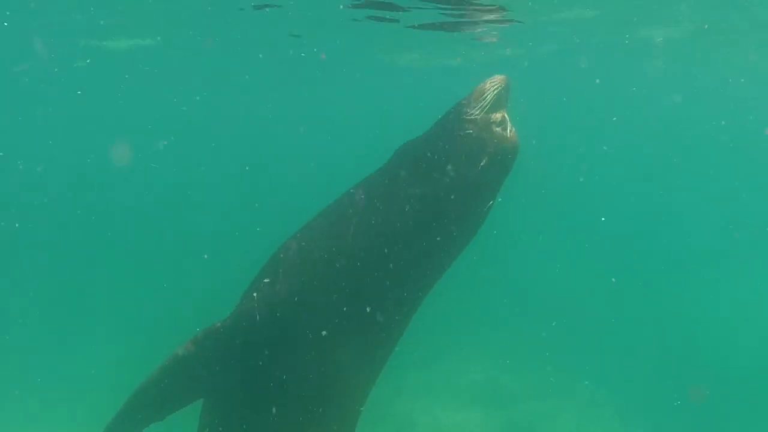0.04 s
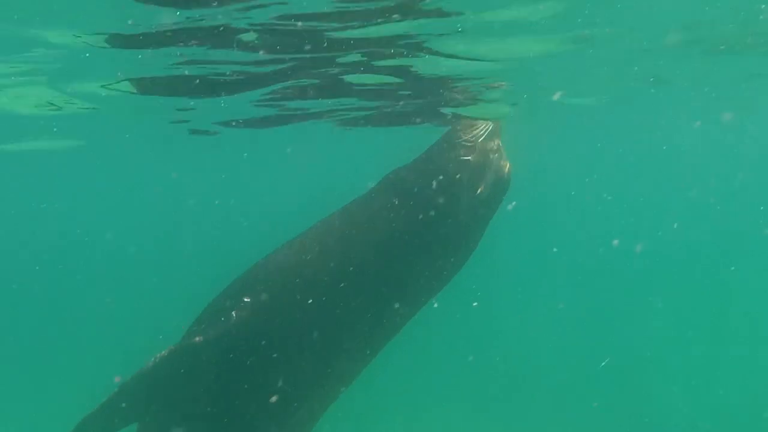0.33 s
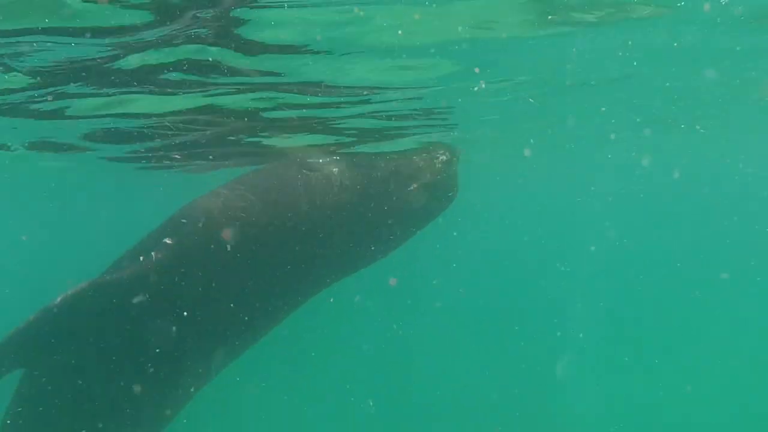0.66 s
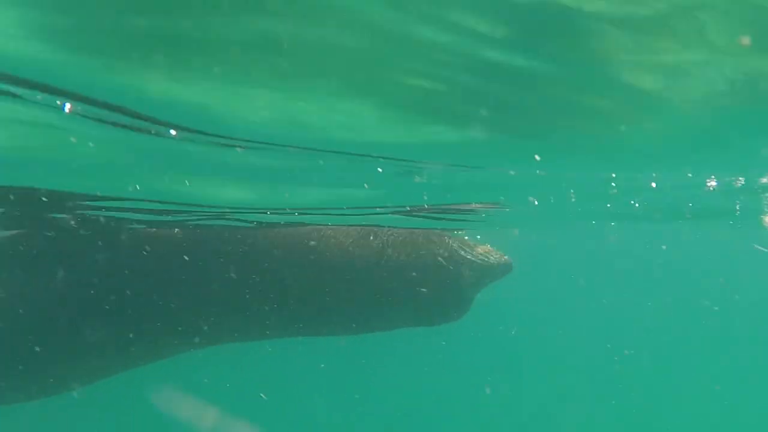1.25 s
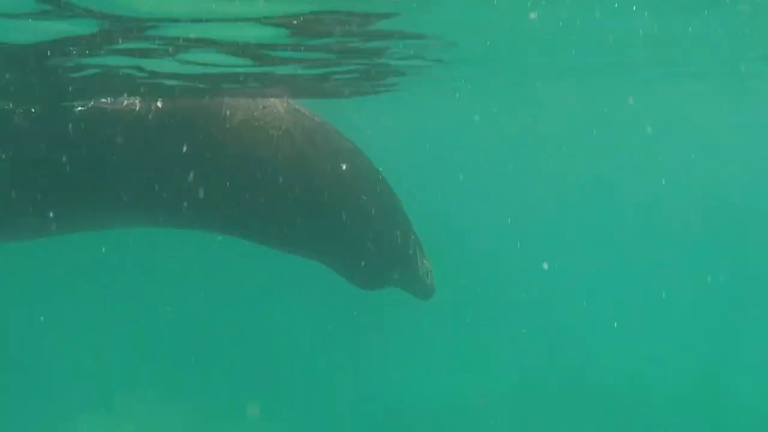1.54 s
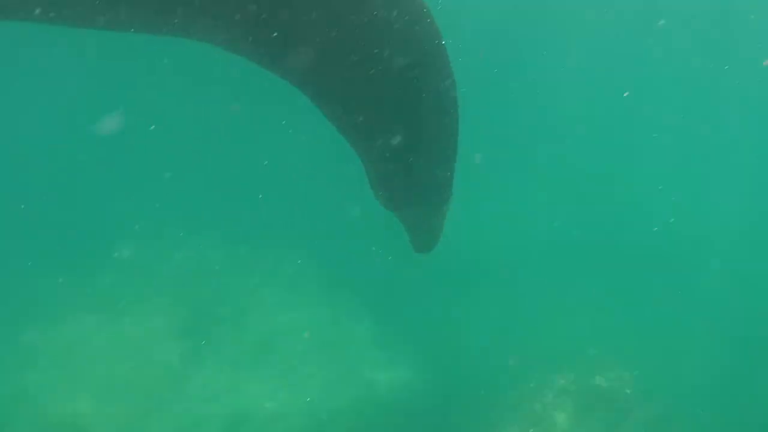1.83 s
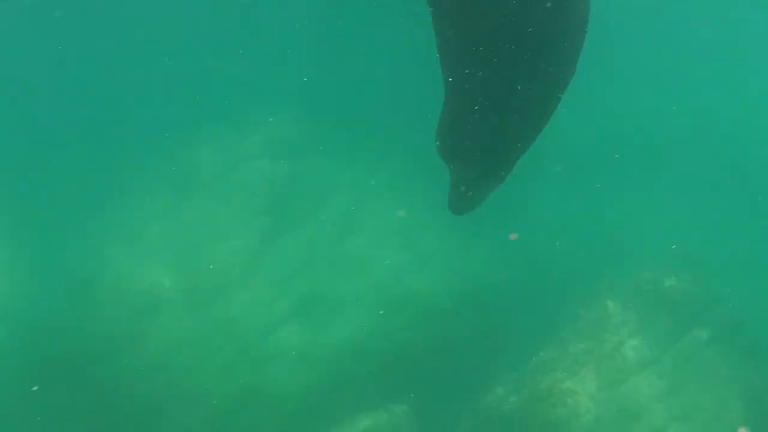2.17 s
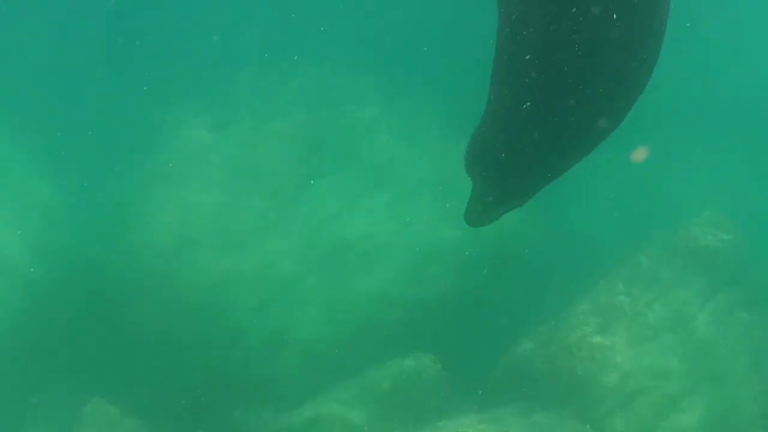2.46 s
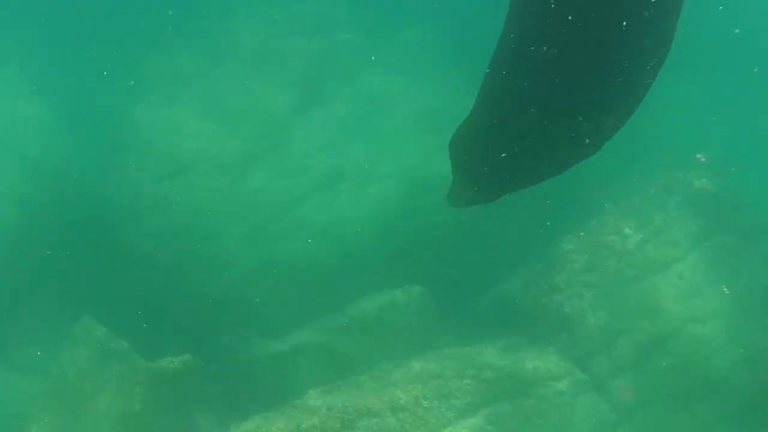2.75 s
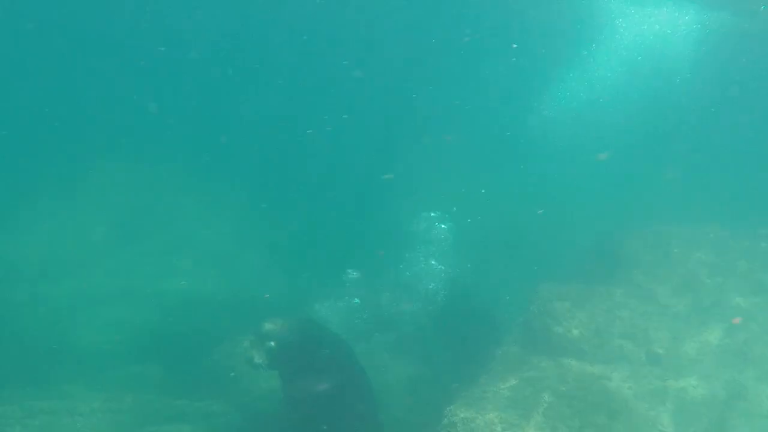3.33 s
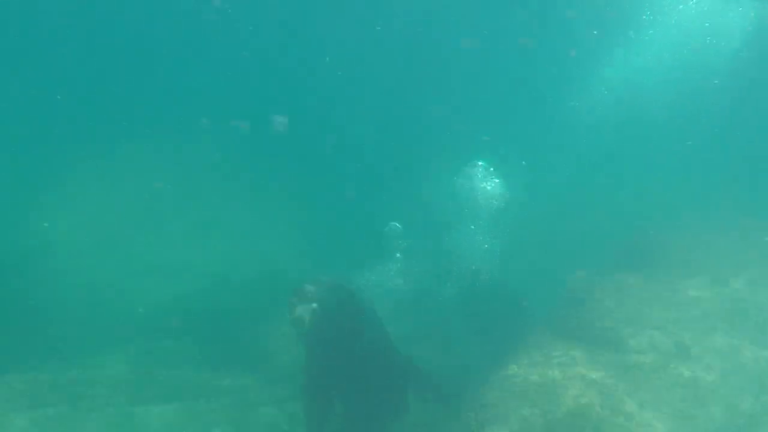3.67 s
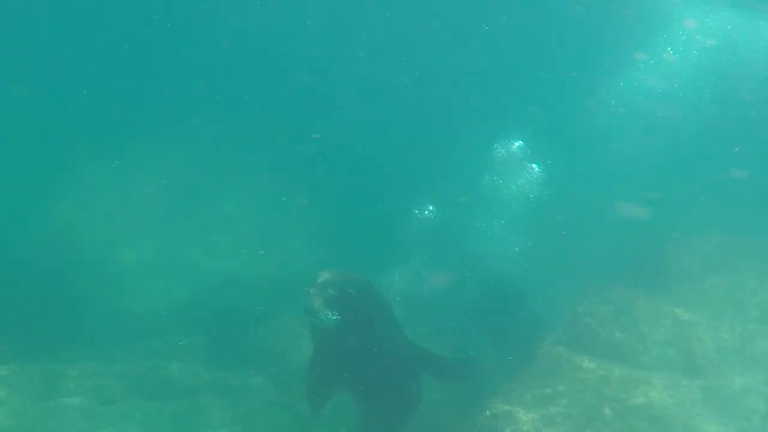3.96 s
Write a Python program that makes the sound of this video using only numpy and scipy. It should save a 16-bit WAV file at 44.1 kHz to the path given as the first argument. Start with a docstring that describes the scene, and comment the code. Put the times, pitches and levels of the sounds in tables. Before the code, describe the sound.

Short, low sea lion barks repeat underwater over gurgling water and faint shrimp crackle.

```python
"""Under water, shrimp crackle on the rocks and water gurgles around a camera's sealed housing, which
rings near 450 Hz. At 0.3 s a sea lion close by gives the first of nine barks, among gulps and knocks.
Most barks open with a rough yelp and a thump, then settle into a clearer, slowly rising tone.
A limiter turns the crackle down under the loud ones. From about 2 s, as the camera follows the dive,
water flowing over the housing rumbles and sheds big bubbles, in surges that grow toward the end."""
import sys
import numpy as np
from scipy import signal
from scipy.fft import rfft, irfft
from scipy.io import wavfile
from scipy.ndimage import uniform_filter1d, minimum_filter1d

SR = 44100
rng = np.random.default_rng(int(sys.argv[2]) if len(sys.argv) > 2 else 0)


def inscribe(sig):
    """Save sig as 16-bit PCM at rate SR to the path in sys.argv[1].

    A 1-D sig is mono; a 2-D sig holds one channel per row.
    Samples are clipped to [-1, 1] before scaling.
    """
    pcm = np.round(np.clip(np.atleast_2d(sig).T, -1, 1) * 32767)
    wavfile.write(sys.argv[1], SR, pcm.astype(np.int16))


N = 176400
T = np.arange(N) / SR
EARS = np.array([[1], [-1]])  # opposite signs in the left and right ear


def from_db(db):
    """Turn decibels into a number to multiply by."""
    return 10 ** (np.asarray(db) / 20)


def unit_power(x):
    """Scale a sound to an average power of 1."""
    return x / np.sqrt(np.mean(x ** 2) + 1e-20)


def curves(rows):
    """Join rows of (time, values...) with straight lines, one curve per value."""
    times, *columns = np.transpose(rows)
    return [np.interp(T, times, column) for column in columns]


def gain_at(spectrum, hz):
    """How strongly a spectrum passes the given frequencies."""
    freqs, db = np.transpose(spectrum)
    return from_db(np.interp(np.log(np.maximum(hz, 1)), np.log(freqs), db))


def colour(x, spectrum):
    """Give a sound this spectrum, ringing only after each hit (a minimum-phase filter)."""
    size = 2 * N
    gains = unit_power(gain_at(spectrum, np.arange(N + 1) * SR / size))
    cepstrum = irfft(np.log(gains))
    cepstrum[1:N] *= 2
    cepstrum[N + 1:] = 0
    return irfft(rfft(x, size) * np.exp(rfft(cepstrum)))[:N]


def noise(spectrum):
    """Noise with this spectrum and a power of 1."""
    return unit_power(colour(rng.standard_normal(N), spectrum))


def drift(rate_hz):
    """A smooth random wander, about 1 in size."""
    pole = np.exp(-2 * np.pi * rate_hz / SR)
    wander = signal.lfilter([1], [1, -2 * pole, pole * pole], rng.standard_normal(N + SR))
    return unit_power(wander[SR:])


def keep_band(x, hz, side):
    """Keep the "low" or the "high" side of a frequency."""
    return signal.sosfilt(signal.butter(4, hz, side, fs=SR, output="sos"), x)


def resonance(hz, centre_hz, width_hz):
    """A gain of 1 at the centre that falls away on both sides."""
    return 1 / (1 + (2 * (hz - centre_hz) / width_hz) ** 2)


def die_away(age, ring_time):
    """A fade that loses 60 dB in one ring time."""
    return np.exp(-np.minimum(np.log(1000) * age / ring_time, 20))


# The nearest shrimp snaps: (time [s], relative level [dB])
NEAR_SNAPS = [(0.072, -35), (0.204, -28.5), (0.4772, -30), (0.5718, -37), (0.591, -36), (0.676, -35.5),
              (0.9695, -33), (1.055, -30.5), (1.335, -36), (1.4436, -37), (2.137, -34.5), (2.4028, -41.5),
              (3.0888, -40), (3.1654, -40), (3.43, -39.5), (3.501, -32), (3.697, -35), (3.8058, -42)]
# How loud the distant shrimp are: (time [s], level [dB])
CRACKLE_LEVEL = [(0, -50), (1.08, -51), (1.4, -55), (2.0, -58), (2.9, -56), (3.5, -51.5), (4, -51)]
# The tone of the crackle in the housing: (frequency [Hz], relative level [dB])
CRACKLE_SPECTRUM = [(1000, -7.5), (2100, -5.5), (3200, -14.5), (4500, -11), (6400, -9.5), (7500, -5),
                    (8400, -4), (9500, -7), (11500, -16), (13500, -22.5), (15000, -33)]
# The part of the fizz that differs between the ears: (frequency [Hz], relative level [dB])
FIZZ_STEREO = [(8000, -29.5), (12500, -9.5)]
def shrimp(far_snaps_per_s=260, spread_db=4, decay_s=0.0015, ring_hz=8230, scatter_hz=406.6):
    """A few near snaps, many far ones and their merged fizz, all ringing the housing near 8 kHz."""
    level = from_db(curves(CRACKLE_LEVEL)[0])
    sizes = from_db(spread_db * np.minimum(rng.exponential(1, N), 5)) * rng.choice([-1, 1], N)
    far = level * from_db(-6) * unit_power(sizes * (rng.random(N) < far_snaps_per_s / SR))
    near_level = np.zeros(N)
    for time, db in NEAR_SNAPS:
        near_level += from_db(db - 3.5) * (T >= time) * np.exp(-np.minimum(abs(T - time) / decay_s, 20))
    ring = np.sin(2 * np.pi * np.cumsum(ring_hz + scatter_hz * drift(11)) / SR)
    grit = rng.choice([-1, 1], N)
    snaps = keep_band(near_level * (ring + grit) + far, 4340, "high")
    fizz = level * from_db(-2) * rng.standard_normal(N)
    centre = colour(snaps + fizz, CRACKLE_SPECTRUM)
    stereo_gain = gain_at(FIZZ_STEREO, np.fft.rfftfreq(N, 1 / SR))
    sides = irfft(rfft(noise(CRACKLE_SPECTRUM)) * stereo_gain, N)
    return centre + level * sides * EARS


# The tone of stirred water in the housing: (frequency [Hz], relative level [dB])
WATER_SPECTRUM = [(25, -16), (105, -35.5), (150, -4.5), (200, -8.5), (290, -8), (370, -4), (455, 1.5),
                  (540, -5.5), (720, -13), (900, -22.5), (1400, -28), (2300, -44), (4000, -90.5)]
# How loud the gurgling is: (time [s], level [dB])
WATER_LEVEL = [(0, -26.5), (.55, -31), (1.02, -27.5), (1.5, -33.5), (1.85, -32), (2.3, -31), (2.85, -30.5),
               (3.35, -32.5), (3.7, -29.5)]
def gurgles(plops_per_s=250, top_hz=790):
    """Small pockets of air stir the water and ring the housing, over a smooth, distant wash."""
    plops = rng.standard_normal(N) * (rng.random(N) < plops_per_s / SR)
    gurgle = unit_power(keep_band(colour(plops, WATER_SPECTRUM), top_hz, "low"))
    wash = from_db(-1) * noise(WATER_SPECTRUM)
    sides = from_db(-29.5) * noise(WATER_SPECTRUM) * EARS
    return from_db(curves(WATER_LEVEL)[0]) * (unit_power(gurgle + wash) + sides)


def big_bubbles(per_s=54, low_hz=149.3, high_hz=340, ring_cycles=8.9):
    """Each bubble rings at a random low pitch for a few cycles."""
    out = np.zeros(N)
    for when, pitch, size in rng.random((int(per_s * N / SR), 3)):
        first = int(when * N)
        hz = low_hz * (high_hz / low_hz) ** pitch
        cycles = hz * T[:min(N - first, int(SR * ring_cycles / hz))]
        envelope = size ** 2 * (1 - np.exp(-cycles)) * die_away(cycles, ring_cycles)
        out[first:first + len(cycles)] += envelope * np.sin(2 * np.pi * cycles)
    return unit_power(out)


# Surges of water past the housing: (time [s], level [dB])
FLOW_LEVEL = [(0, -46), (.15, -53), (1.0, -66.5), (1.85, -66), (2.05, -43.5), (2.23, -27.5), (2.43, -32.5),
              (2.52, -17.5), (2.61, -22), (2.85, -32.5), (3.0, -16.5), (3.1, -35), (3.39, -31.5),
              (3.49, -11.5), (3.72, -22), (3.9, -11), (4, -12.5)]
# The tone of their rumble: (frequency [Hz], relative level [dB])
RUMBLE_SPECTRUM = [(10, -31.5), (25, 2), (80, 0), (115, -6), (170, -6.5), (300, -16), (600, -30),
                   (1200, -37), (3000, -81)]
def flow(bubbles_db=-12.5):
    """Water rumbles over the housing and sheds bubbles; both swell and fade together."""
    level = from_db(curves(FLOW_LEVEL)[0])
    return level * (noise(RUMBLE_SPECTRUM) + from_db(bubbles_db) * big_bubbles())


# Dull knocks on the housing: (time [s], peak level [dB])
KNOCKS = [(.368, -15), (.435, -19), (2.31, -22.5), (2.66, -16.5), (2.832, -23.5), (3.28, -20.5),
          (3.617, -13), (3.795, -15.5)]
# The tone of one knock: (frequency [Hz], relative level [dB])
KNOCK_SPECTRUM = [(150, -11.5), (450, -0.5), (750, -12), (1050, -3.5), (1600, -22), (3500, -56)]
def knocks():
    """Short taps make the housing ring."""
    ring = colour(1.0 * (T == 0), KNOCK_SPECTRUM)
    taps = np.zeros(N)
    for time, db in KNOCKS:
        taps[int(time * SR)] = from_db(db)
    return signal.fftconvolve(taps, ring / abs(ring).max())[:N]


# Gulps of water and air at the housing: (time [s], relative level [dB], pitch [Hz], ring time [s])
GULPS = [(.001, -22.5, 161.2, 0.26), (0.126, -24.5, 162, 0.21), (0.224, -17.5, 453, 0.056),
         (0.817, -13, 439, 0.074), (.928, -17.5, 479, 0.096), (1.001, -13.5, 473, 0.11),
         (1.922, -17, 506, 0.028), (2.285, -20.5, 496, 0.14), (2.312, -19.5, 253.4, 0.27),
         (2.652, -8, 429, 0.066), (3.611, -9, 435, 0.098), (3.836, -9.5, 260, 0.18),
         (3.871, -4, 307.3, 0.29)]
def gulps(rise_s=0.0013, boost_db=4.5):
    """Each pocket of air sounds a note that swells quickly and dies away."""
    out = np.zeros(N)
    for time, db, hz, ring_s in GULPS:
        first = int(time * SR)
        age = T[:N - first]
        envelope = from_db(db + boost_db) * (1 - np.exp(-age / rise_s)) * die_away(age, ring_s)
        out[first:] += envelope * np.sin(2 * np.pi * hz * age)
    return out


def with_echo(x, echo_db=-14.5, ring_s=.2):
    """The surface and the rocks scatter a sound, adding a short, blurred tail."""
    tail = rng.standard_normal(N) * die_away(T, ring_s)
    return x + from_db(echo_db) * signal.fftconvolve(x, tail / np.linalg.norm(tail))[:N]


# The blunt thumps that open most barks: (time [s], level [dB], pitch [Hz])
THUMPS = [(.666, -6.5, 550), (1.128, 8, 527.5), (1.589, -1.5, 519.4), (2.054, -3, 437), (2.972, 3.5, 525),
          (3.455, -15.5, 474), (3.89, -4, 477)]
def thumps(width_s=0.006, sag_hz_per_s=3700):
    """A short swell of the throat, falling in pitch, overlaps the start of the voice."""
    out = np.zeros(N)
    for time, db, hz in THUMPS:
        on = abs(T - time) < 10 * width_s
        t = T[on] - time
        phase = 2 * np.pi * (hz - sag_hz_per_s * t / 2) * t
        out[on] += from_db(db) / np.cosh(t / width_s) * np.sin(phase)
    return out


# The tone of the rasp through throat and housing: (frequency [Hz], relative level [dB])
RASP_SPECTRUM = [(100, -53), (150, -9.5), (210, -7.5), (290, -8.5), (380, -8), (450, 1), (560, -4),
                 (680, -10.5), (850, -40), (1100, -29), (1300, -38.5), (1900, -54), (3000, -73.5),
                 (6000, -110)]
def throat_rasp(flaps_per_s=84, unevenness=.3, flutter_hz=90):
    """Loose tissue flaps unevenly, with some noise from rushing air."""
    flap_rate = flaps_per_s * np.exp(unevenness * drift(flutter_hz))
    flap_count = np.floor(np.cumsum(flap_rate) / SR)
    flaps = unit_power(colour(np.diff(flap_count, prepend=0), RASP_SPECTRUM))
    return unit_power(flaps + from_db(-5.5) * noise(RASP_SPECTRUM))


# A growl one octave below the first bark: (time [s], level [dB])
GROWL_LEVEL = [(.305, -61.5), (.335, -4.5), (.378, -9), (.4, -17), (.44, -36)]
# The nine barks: (nose ring [dB], mouth ring [dB], time both rings close [s], voice rows)
# A voice row: (time [s], pitch [Hz], level [dB], second harmonic's weight [dB], roughness [0 = clear])
BARKS = [ (-58, -56.5, 0.37, [(.287, 486.4, -25.5, -39, 0.83), (.312, 447, 0.5, -21, 0.29),
         (.335, 431.8, -13.5, -29, 0.97), (.378, 402.6, -11.5, -15, 1.2), (.42, 440, -13.5, -9.5, 0.08),
         (.447, 475.6, -4, -25, 0.12), (.478, 475, -19.5, -28.5, 0.08)]),
         (-25, -53.5, .762, [(.635, 332.6, -32.5, 7, 0.55), (.682, 362.2, -7, -3, 0.8),
         (.706, 368.5, -11.5, -11, 0.36), (.73, 378.3, -12.5, 2.5, 0.06), (.765, 393.7, -20.5, 15, 0.01),
         (.792, 424.3, -16.5, -14, 0.08)]), (-36, -43.5, 1.235, [(1.095, 320.3, -27.5, 4.5, 0.54),
         (1.118, 302.7, -3, 14, 0.37), (1.138, 360.6, 3.5, -14, 1.06), (1.165, 358.3, -1.5, -12, 0.73),
         (1.205, 371.3, -8.5, -7, 0.7), (1.245, 439.8, -1.5, -22.5, 0.3), (1.287, 395, -23.5, 4, 0.44),
         (1.32, 431, -7, -38.5, 0.2), (1.36, 456.4, -9.5, -44, 0.05), (1.39, 464.6, -22.5, -33, 0.12)]),
         (-43, -42.5, 1.74, [(1.57, 356, -31, 6, 0.44), (1.606, 319, -12.5, -5.5, 0.54),
         (1.638, 290, 13, -2.5, 0), (1.662, 316.5, -7.5, -17, 0.31), (1.69, 349.3, -0.5, 5, 0.1),
         (1.748, 385.7, -19, -8, 0.24), (1.769, 427, 3, -26.5, 0), (1.793, 438, -17, -22, 0.16)]),
         (-37, -49.5, 2.185, [(2.02, 340, -19.5, 10, 0.56), (2.042, 321.3, -17, 13.5, 0.33),
         (2.06, 383.5, -1.5, -19.5, 0.79), (2.095, 361, -7, -6, 0.14), (2.128, 361.7, 2, -15, 0.15),
         (2.158, 375.5, -2.5, -17, 0.05), (2.178, 394.3, -8.5, -18.5, 0.2), (2.213, 444.2, -11, -38, 0)]),
         (-36, -51, 2.612, [(2.48, 450.6, -28, -19.5, 0.25), (2.512, 384.8, -12, -24, 0.37),
         (2.55, 359.7, -10.5, -9.5, 0.19), (2.572, 362.4, -17, -10.5, 0.3),
         (2.612, 407.7, -16, -20.5, 0.27), (2.645, 464, -27.5, -30, 0)]),
         (-21, -49.5, 3.135, [(2.947, 335.3, -25, 14, 0.38), (2.965, 312, -11, 11.5, 0.23),
         (2.988, 355, -14.5, 2.5, 0.15), (3.05, 354, -5.5, 13.5, 0), (3.1, 370.3, -22.5, 2, 0.01),
         (3.135, 389, -18, 1, 0.03), (3.159, 434, -14.5, -7.5, 0.15)]),
         (-33.5, -48, 3.605, [(3.439, 325, -23, 4, 0.34), (3.45, 307.3, -3.5, 20, 0.55),
         (3.468, 349.7, -9.5, 6, 0.81), (3.5, 362.4, -9, -1, 0.04), (3.53, 369.8, -3, 1.5, 0.09),
         (3.57, 393.8, -14.5, 0, 0.43), (3.6, 399.8, -16.5, 7, 0.46), (3.63, 447, -26, -23, 0.54)]),
         (-37.5, -35.5, 4, [(3.87, 340, -14.5, 4, 0.72), (3.895, 310, -5.5, -2, 0.97),
         (3.913, 351.2, -4.5, 3, 0.38), (3.95, 333.8, -1.5, -0.5, 0.04), (3.98, 358.6, -2, 6.5, 0.12),
         (4.0, 366, -8.5, 4.5, 0)]), ]
# How throat, water and housing balance the two lowest harmonics: (frequency [Hz], weight [dB])
THROAT_SPECTRUM = [(280, -6), (360, 4), (450, -0.5), (580, 12), (720, -0.5), (800, -3.5), (900, -20)]
def barks(attack_s=.008, release_s=.016, ring_rise_s=0.046, pitch_shake=.018, level_shake=0.44):
    """Two low harmonics carry each bark; three higher ones ring in the nose and mouth."""
    out = np.zeros(N)
    rasp = from_db(-1) * throat_rasp()
    pitch_flutter, level_flutter = drift(90), drift(90)
    growl = from_db(curves(GROWL_LEVEL)[0]) * (T > GROWL_LEVEL[0][0]) * (T < GROWL_LEVEL[-1][0])
    harmonic = np.arange(1, 6)[:, None]  # tones at 1 to 5 times the pitch
    waver = from_db(5.5 * np.array([drift(10) for _ in harmonic]))  # from travelling through water
    fray = from_db(-3) * np.array([drift(110) for _ in harmonic])  # each harmonic's own hoarseness
    for nose_db, mouth_db, close_s, rows in BARKS:
        start, end = rows[0][0], rows[-1][0]
        on = (T > start - 10 * attack_s) & (T < end + 10 * release_s)
        t = T[on]
        hz, db, second_db, rough = [curve[on] for curve in curves(rows)]
        fade_in = np.exp(np.minimum(t - start, 0) / attack_s)
        fade_out = np.exp(-np.maximum(t - end, 0) / release_s)

        # Roughness shakes the pitch and the loudness, and mixes in the rasp.
        phase = 2 * np.pi * np.cumsum(hz * (1 + pitch_shake * rough * pitch_flutter[on])) / SR
        tones = np.sqrt(2) * np.sin(harmonic * phase) * (1 + level_shake * rough * level_flutter[on])
        lowest_two = (harmonic == 1) + from_db(second_db) * (harmonic == 2)
        weights = gain_at(THROAT_SPECTRUM, harmonic * hz) * lowest_two
        voice = (weights * tones).sum(0) / np.sqrt((weights ** 2).sum(0)) + rough * rasp[on]
        lower = from_db(db) * fade_in * fade_out * voice / np.sqrt(1 + rough ** 2)

        # The nose and mouth rings swell more slowly than the voice.
        nose = from_db(nose_db) * resonance(harmonic * hz, centre_hz=1088, width_hz=130)
        mouth = from_db(mouth_db) * resonance(harmonic * hz, centre_hz=1556, width_hz=310)
        opening = np.clip((t - start + attack_s) / ring_rise_s, 0, 1)
        closing = np.exp(-np.maximum(t - close_s, 0) / release_s)
        hoarse = tones + np.sqrt(2 * rough) * fray[:, on] * np.cos(harmonic * phase)
        upper = opening * closing * ((nose + mouth) * (harmonic > 2) * waver[:, on] * hoarse).sum(0)
        out[on] += lower + upper + growl[on] * np.sqrt(2) * np.sin(phase / 2)
    return out


def scene():
    """The sea lion and the water around it, nearly the same in both ears."""
    sea_lion = with_echo(barks() + thumps())
    return sea_lion + gulps() + knocks() + gurgles() + flow() + shrimp()


def record(dry, limit_db=-5.5, share=0.81, recovery_db_per_s=81, window_s=0.0035, top_hz=15000):
    """A limiter turns loud moments down fast and recovers slowly; then the highest treble is cut."""
    window = int(window_s * SR)
    level_db = 20 * np.log10(abs(dry).max(0) + 1e-9)
    cut_db = share * np.maximum(level_db - limit_db, 0)
    held_db = np.maximum.accumulate(cut_db + recovery_db_per_s * T) - recovery_db_per_s * T
    gain = from_db(uniform_filter1d(minimum_filter1d(-held_db, window), window))
    return signal.sosfilt(signal.cheby2(12, 70, top_hz, fs=SR, output="sos"), dry * gain)


dry = scene()
out = record(dry)
inscribe(out)
```